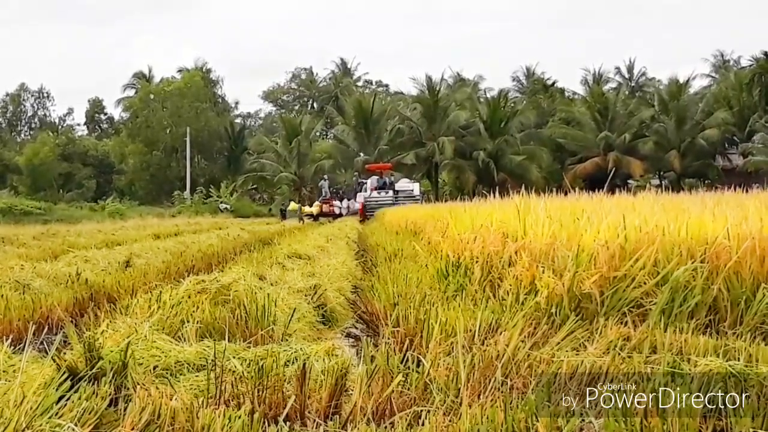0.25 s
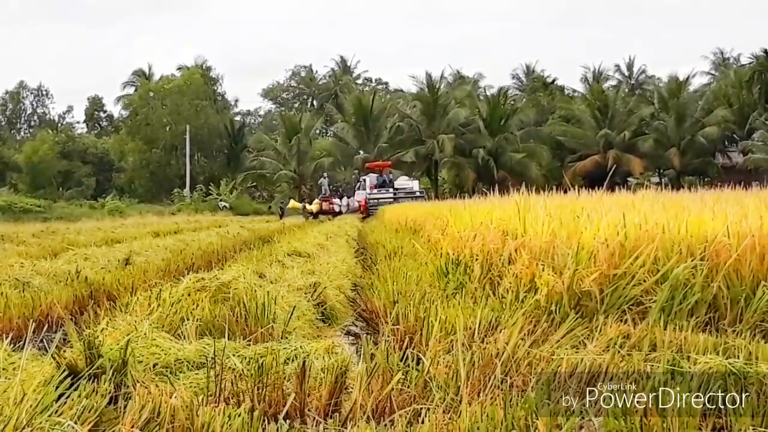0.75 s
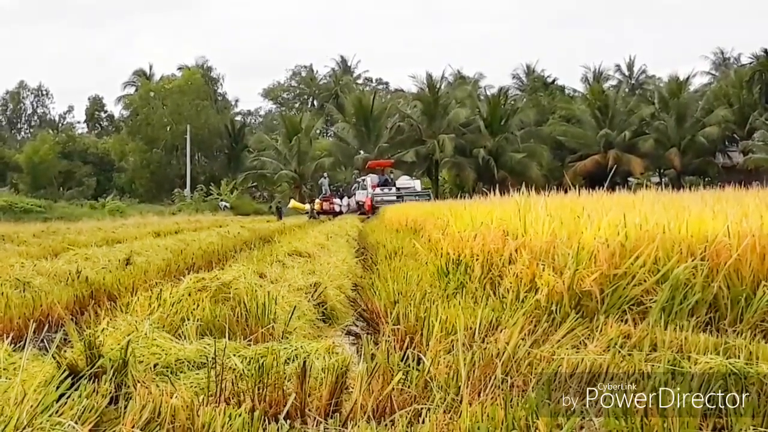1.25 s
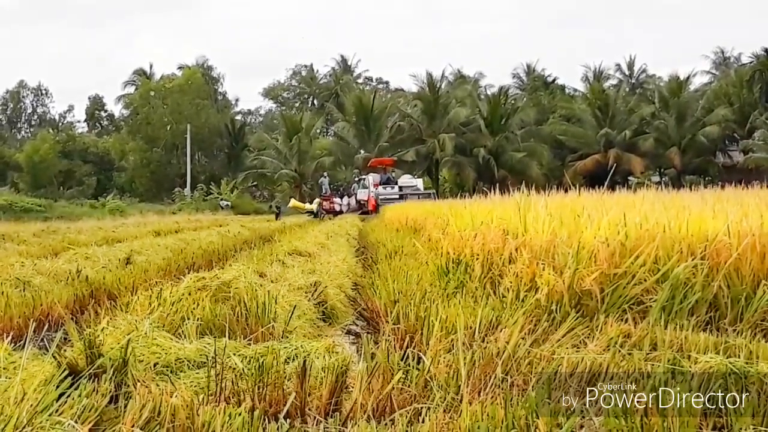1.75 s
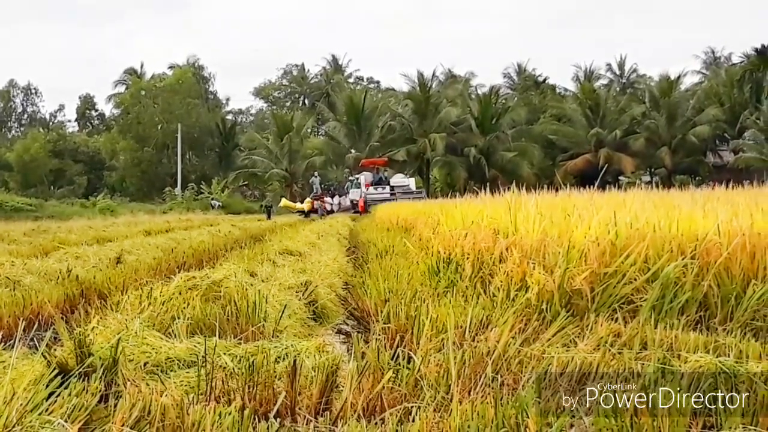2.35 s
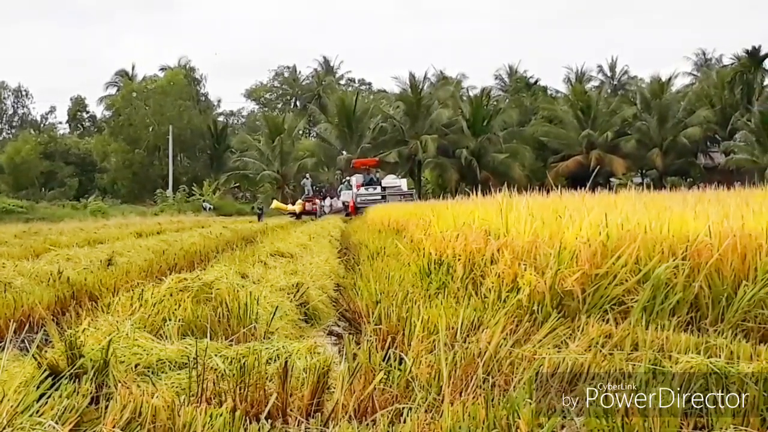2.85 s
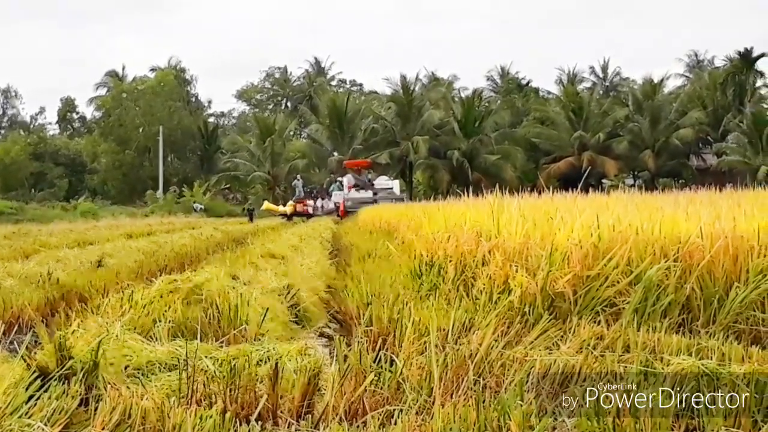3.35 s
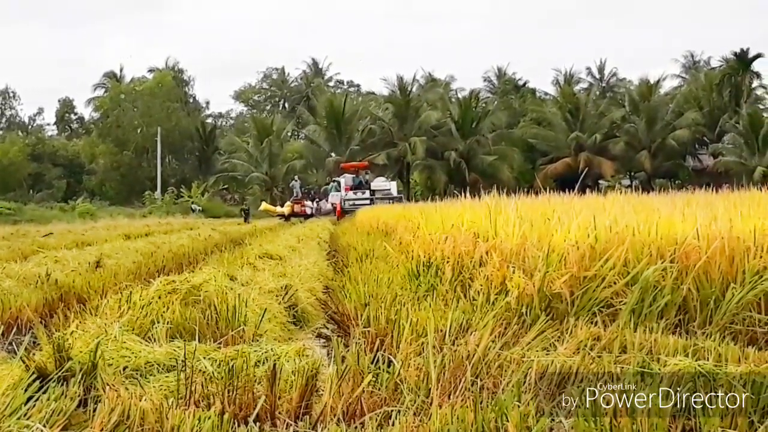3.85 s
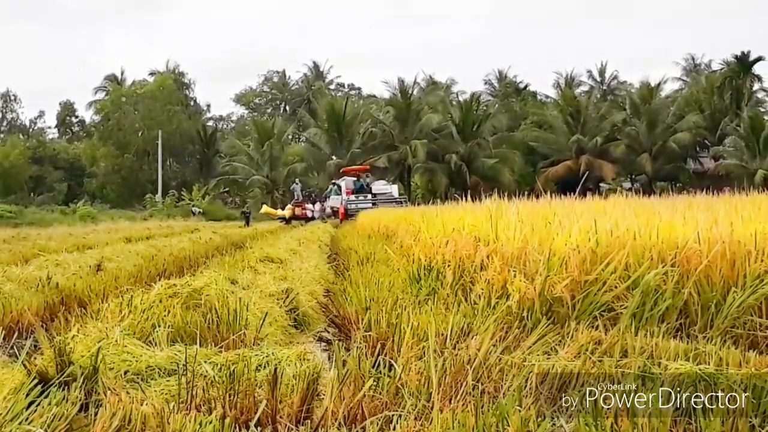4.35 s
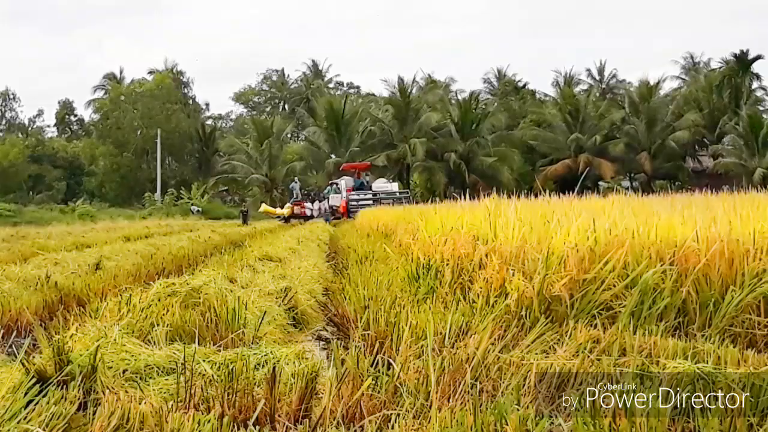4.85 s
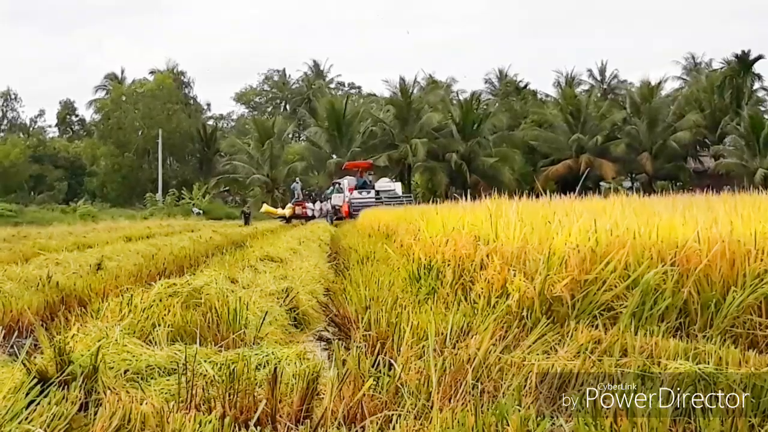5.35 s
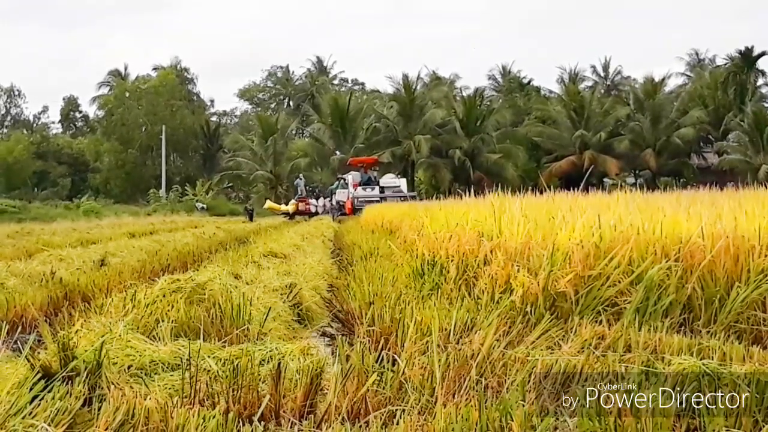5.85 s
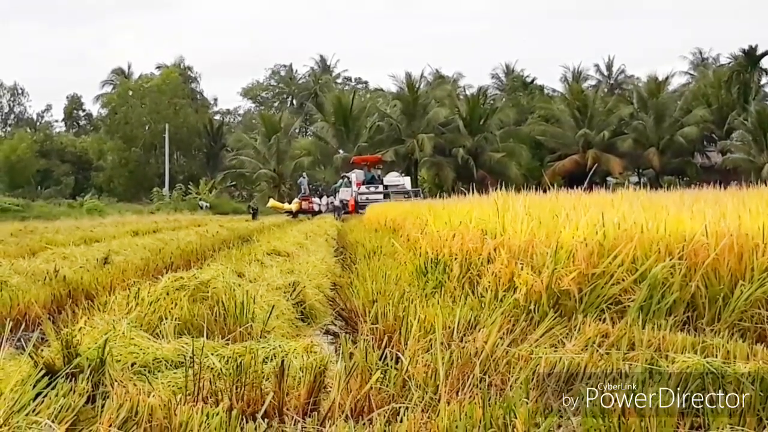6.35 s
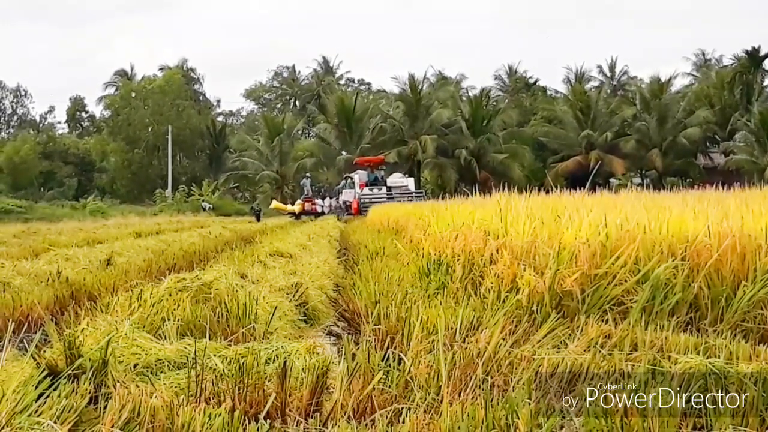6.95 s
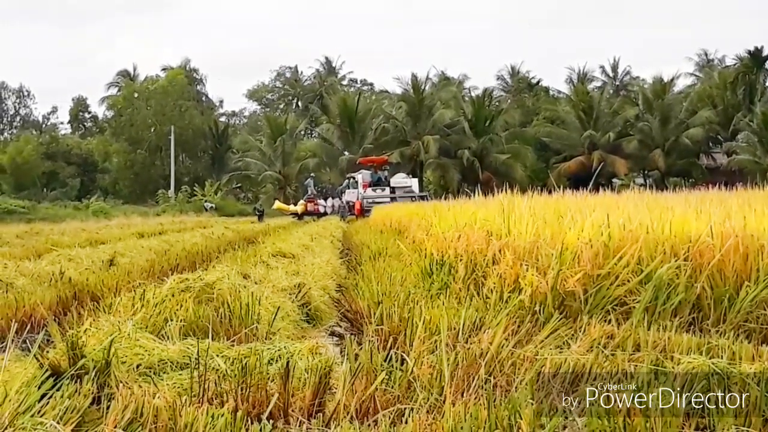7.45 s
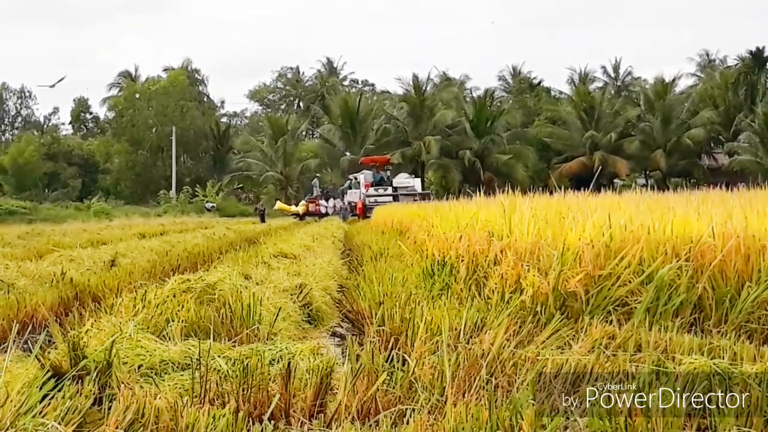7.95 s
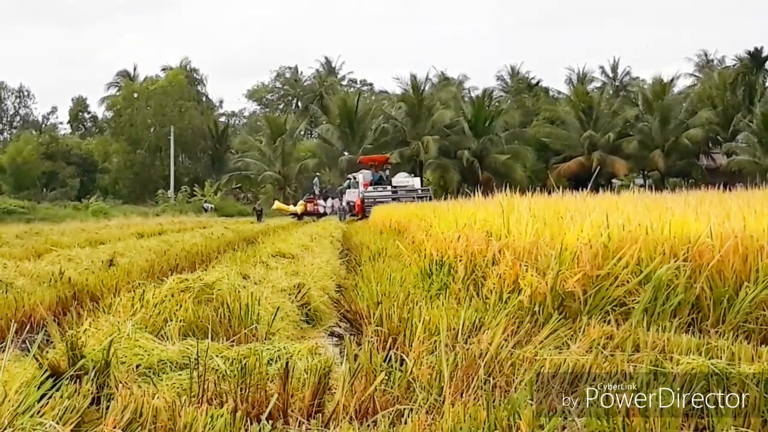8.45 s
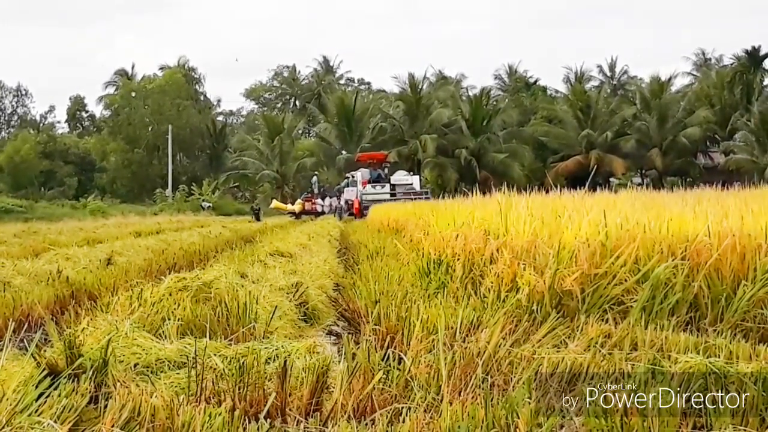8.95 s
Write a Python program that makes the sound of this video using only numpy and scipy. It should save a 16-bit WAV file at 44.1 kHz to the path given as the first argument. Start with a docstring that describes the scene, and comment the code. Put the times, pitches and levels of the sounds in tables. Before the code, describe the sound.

A combine harvester's diesel engine drones steadily as it cuts rice, slowly drawing nearer, with rattling and hissing straw.

```python
"""A combine harvester creeps toward a microphone standing in a rice field. Its four-cylinder diesel
drones, a slower shaft beats against the firing note, and crop pounds the threshing drum into a roar
over the rumble of the panels. Sieves rattle, stalks ring the knife and straw hisses.
A low hum sweeps up once. Close by, dry leaves brush together; a small bird chirps and thin squeaks
sound high above the drone."""
import sys
import numpy as np
from scipy.fft import rfft, irfft, next_fast_len
from scipy.io import wavfile
from scipy.ndimage import uniform_filter1d, map_coordinates

SR = 44100
rng = np.random.default_rng(int(sys.argv[2]) if len(sys.argv) > 2 else 0)


def materialize(psi):
    """Save the field psi as 16-bit PCM at rate SR to the path in sys.argv[1].

    A 1-D psi becomes a single channel; in a 2-D psi each row is a channel.
    """
    bounded = np.clip(np.atleast_2d(psi).T, -1, 1)
    quanta = np.round(bounded * 32767).astype(np.int16)
    wavfile.write(sys.argv[1], SR, quanta)


N = 406161

# The diesel. Each row: time in seconds, firing rate in Hz, level of that note in dB, of its octave in dB.
DIESEL = [(0, 95.3, -51.1, -34), (0.65, 94.7, -41, -36.5), (1.2, 95.2, -34.5, -35.0),
          (1.95, 93.8, -29, -27.5), (2.45, 94.56, -30, -31.4), (3.0, 93.97, -32.5, -27.4),
          (3.7, 94.4, -35.6, -26.0), (4.1, 94.6, -29.8, -24.5), (4.45, 94.1, -26.5, -26.7),
          (4.8, 93.63, -26.3, -20), (5.25, 93.2, -28, -20), (5.75, 94.3, -27, -31.1),
          (6.15, 93.56, -34.5, -33.5), (7.3, 92.26, -34.5, -31), (7.9, 94.6, -33.5, -33),
          (8.4, 94.4, -38, -41.9), (8.85, 94.93, -36.6, -24), (9.21, 95, -31, -27.5)]
# The way toward the microphone. Each row: time in seconds, nearness from 0 (far) to 1 (near).
NEARNESS = [(0, 0.09), (2.9, 0.07), (3.8, 0.51), (7.3, .65), (8.1, 0.91), (9.21, 1)]
# Faint machine tones. Each row: pitch in Hz, opening level in dB, closing level in dB.
MACHINE_WHINES = [(257, -46, -45.5), (348.8, -40.5, -37.5), (412.7, -53, -45.5), (514.3, -51.5, -50),
                  (558, -53.5, -50.5), (631, -80, -56.5), (770, -76, -59), (1618, -65, -70)]
# Spectra of the panels, drum, sieves, straw and leaves. Each row: frequency in Hz, relative level in dB.
PANEL_SPECTRUM = [(10, -46), (28, -40), (45, -21.5), (62, -18.5), (82, -4.5), (120, -1.5), (160, 3),
                  (200, -6.5), (260, -20), (400, -58), (700, -120)]
DRUM_SPECTRUM = [(60, -70), (120, -43), (180, 0), (215, 1.5), (290, -.5), (380, -1), (415, -4.5), (440, -5),
                 (490, -6), (555, -13.5), (595, -23), (700, -30), (1000, -56), (1600, -120)]
SIEVE_SPECTRUM = [(100, -35), (640, 3), (780, 3.5), (930, 0), (1160, 2.5), (1470, -4), (1700, -1),
                  (1900, -3.5), (2200, 1), (2500, -4.5), (4000, -37), (9000, -90)]
STRAW_SPECTRUM = [(1500, -25), (4000, 3.5), (4600, 3.5), (5200, 1), (6400, -.5), (7200, -3), (8650, 1),
                  (9050, -3.5), (9600, -10.5), (10600, -8), (11300, -11), (12300, -9.5), (14300, -12.5),
                  (14750, -14), (15400, -27)]
LEAF_SPECTRUM = [(3000, -40), (8500, -8), (10300, 0), (11500, 0), (12400, 2), (14300, -1), (15400, -14)]
# The panels' rumble and the knife's ring at the microphone. Each row: time in seconds, level in dB.
PANEL_LEVELS = [(0, -29.5), (1.4, -30.5), (3.7, -26), (5.5, -26.7), (6.2, -29), (7.55, -26), (9.21, -28.5)]
KNIFE_LEVELS = [(0, -47), (1.15, -44.5), (2.8, -47.5), (4.05, -48), (4.75, -45.3), (6.9, -46.3),
                (7.65, -47.8), (9.21, -46.5)]
# Clumps of crop passing through the drum. Each row: middle in seconds, gain in dB.
CROP_CLUMPS = [(3.85, 1), (6.15, 2), (6.9, 2.5), (8.1, 2.5)]
# The cutter bar's steel. Each row: resonance in Hz, width in Hz, relative level in dB.
KNIFE_RESONANCES = [(2790, 310, -1), (2884, 70, -2.5), (3110, 100, 0), (3333, 180, 0.5), (3470, 170, -2.5),
                    (3720, 115, -0.5), (3950, 220, -3), (4180, 190, -5)]
# Swells in the straw's hiss. Each row: middle in seconds, half length in seconds, gain in dB.
STRAW_SURGES = [(.7, .3, 1), (9.1, 0.27, 0.8)]
# The rising hum's harmonics. Each row: multiple of the pitch, relative level in dB.
HUM_HARMONICS = [(1, -7), (2, 2.5), (3, -9), (4, -19)]
# The bird's chirp and the thin squeaks. Each row: start in seconds, length in seconds,
# first, middle and last pitch in Hz, level in dB, pitch jitter in Hz.
CALLS = [(3.21, .14, 13200, 13500, 13300, -58, 550), (3.255, .12, 11500, 12050, 12300, -57, 280),
         (3.367, 0.14, 12750, 12800, 11600, -53, 170), (3.38, .14, 12900, 13450, 13700, -57.5, 330),
         (3.525, .08, 14600, 13500, 12400, -54, 150), (4.073, 0.091, 4340, 4720, 5300, -51, 90),
         (6.015, .052, 12100, 13400, 14450, -55, 120), (6.065, .09, 13600, 13700, 13200, -60, 280),
         (6.08, .15, 11450, 11700, 11150, -62, 170), (6.15, .11, 14330, 14100, 13100, -59, 140),
         (6.26, .09, 12400, 11900, 11100, -63, 130), (6.688, .18, 13470, 13400, 13300, -54, 550)]
# Dry leaves near the microphone. Each row: middle in seconds, level in dB.
LEAF_TOUCHES = [(.1, -68), (.75, -66), (4.88, -60), (5.0, -58), (5.07, -60), (5.21, -62), (5.41, -60),
                (5.56, -61)]

# Each pair: level with the machine far off, level with it near.
DRUM_DB, SIEVE_DB, STRAW_DB = (-30, -25), (-49.5, -46.5), (-51, -50)
SHAFT_DB, SHAFT_OCTAVE_DB = (-44, -35.5), (-39.5, -40.5)


def diesel(firing, note_db, octave_db):
    """The exhaust note wavers on its way over the field; unequal cylinders add weak lines around it."""
    waver_db = lambda: wobble(rate=7)
    overtone = lambda order: np.sin(order * firing + rng.uniform(0, 2 * np.pi))
    note = amp(note_db + waver_db()) * np.sin(firing)
    octave = amp(octave_db + waver_db()) * overtone(2)
    third = amp(note_db - 10) * overtone(3)
    uneven = sum(overtone(order) / order for order in np.arange(5, 23) / 4)  # four firings to a cycle
    return np.sqrt(2) * (note + octave + third) + amp(-36.5 + 0.67 * wobble(2.4)) * unit(uneven)


def thresher(firing):
    """The panels rumble, and dense blows of crop roar in the drum, harder at each firing."""
    rumble_db = curves(PANEL_LEVELS)[0] + 0.6 * wobble(2.91)
    clumps_db = sum(db * swell(s, half_length=0.093) for s, db in CROP_CLUMPS)
    roar_db = nearing(DRUM_DB) + 0.42 * wobble(2.98) + clumps_db
    rumble = coloured(rng.standard_normal(N), PANEL_SPECTRUM)
    blows = (impacts(rate=2500) + rng.standard_normal(N)) * (1 + 0.19 * np.cos(firing))
    return amp(rumble_db) * rumble + amp(roar_db) * coloured(blows, DRUM_SPECTRUM)


def shaft(pitch_hz=86.4, boom_db=14.1):
    """A shaft a little slower than the firing rate beats against the drone; its octave booms once."""
    angle = phase_of(pitch_hz + 0.1925 * wobble(1))
    note = amp(nearing(SHAFT_DB) + wobble(2.06)) * np.sin(angle)
    octave_db = nearing(SHAFT_OCTAVE_DB) + boom_db * swell(7.57, half_length=0.18)
    octave = amp(octave_db) * np.sin(2 * angle + 0.7 * wobble(6))
    return np.sqrt(2) * (note + octave)


def whines():
    """Other parts of the machine whine faintly, unsteady in pitch and level."""
    tones = np.zeros(N)
    for hz, start_db, end_db in MACHINE_WHINES:
        level_db = np.linspace(start_db, end_db, N) + 2 * wobble(7)
        pitch_hz = hz * (1 + 0.00904 * wobble(22))
        tones += amp(level_db) * np.sin(phase_of(pitch_hz))
    return np.sqrt(2) * tones


def sieves():
    """The sieves rattle with countless small blows, louder as the machine nears."""
    rattle = impacts(rate=5000) + rng.standard_normal(N)
    return amp(nearing(SIEVE_DB)) * coloured(rattle, SIEVE_SPECTRUM)


def knife(firing):
    """Stalks ring the steel knife as they are cut, with a slight pulse at the crank's rate."""
    def steel(f):  # squaring each peak keeps the ring within its band
        peaks = (amp(2 * db) / (1 + ((f - hz) / width) ** 2) ** 2 for hz, width, db in KNIFE_RESONANCES)
        return np.sqrt(sum(peaks))

    cuts = impacts(rate=8000) + rng.standard_normal(N)
    stroke_db = 0.27 * np.cos(firing / 2) + 0.34 * wobble(25)
    return amp(curves(KNIFE_LEVELS)[0] + stroke_db) * unit(filtered(cuts, steel))


def straw():
    """The straw gives a bright, grainy hiss that swells slightly twice."""
    hiss = coloured(impacts(rate=5000) + 1.47 * rng.standard_normal(N), STRAW_SPECTRUM)
    surge_db = sum(db * swell(s, half_length) for s, half_length, db in STRAW_SURGES)
    return amp(nearing(STRAW_DB) + surge_db + 0.33 * wobble(16)) * hiss


def rising_hum(peak_s=3.5, hz_at_peak=75.5, hz_per_s=100, peak_db=-22, attack_s=0.46, release_s=0.33):
    """A low hum climbs steadily by more than an octave, swells and fades into the drone."""
    t = np.arange(N) / SR - peak_s
    envelope = np.interp(t, [-attack_s, 0], [0, 1]) ** 2 * np.interp(t, [0, release_s], [1, 0])
    angle = phase_of(np.maximum(hz_at_peak + hz_per_s * t, 1))
    tone = sum(amp(db) * np.sin(k * angle) for k, db in HUM_HARMONICS)
    return amp(peak_db) * envelope * unit(tone)


def bird_and_squeaks(flutter_db=2):
    """Each call is a whistle gliding through three pitches, raspy with pitch jitter and level flutter."""
    calls = np.zeros(N + SR)
    for s, length, start_hz, middle_hz, end_hz, db, jitter_hz in CALLS:
        progress = np.linspace(0, 1, int(length * SR))
        glide_hz = np.polyval(np.polyfit([0, .5, 1], [start_hz, middle_hz, end_hz], 2), progress)
        jitter = unit(uniform_filter1d(rng.standard_normal(SR), size=40))[:len(progress)]
        envelope = np.sqrt(np.abs(np.sin(np.pi * progress)))
        whistle = np.sin(phase_of(glide_hz + jitter_hz * jitter))
        calls[round(s * SR):][:len(whistle)] += amp(db) * envelope * whistle
    return calls[:N] * amp(flutter_db * wobble(rate=70))


def leaves():
    """Close to the microphone, dry leaves brush each other in short, fine crackles."""
    touch = sum(amp(db) * swell(s, half_length=0.03) for s, db in LEAF_TOUCHES)
    return touch * coloured(impacts(rate=6000), LEAF_SPECTRUM)


def nearing(far_near_db):
    """A part's level in dB, moving from its far to its near value as the machine approaches."""
    far_db, near_db = far_near_db
    return far_db + (near_db - far_db) * curves(NEARNESS)[0]


def amp(db):
    """Decibels to gain."""
    return 10 ** (np.asarray(db) / 20)


def unit(x):
    """Scaled to rms 1."""
    return x / np.sqrt(np.mean(x ** 2) + 1e-20)


def curves(rows):
    """One value per sample for each column after the time."""
    s, *columns = np.transpose(rows)
    return [np.interp(np.arange(N) / SR, s, column) for column in columns]


def swell(s, half_length):
    """A smooth bump of height 1 around a moment, both arguments in seconds."""
    return np.exp(-((np.arange(N) / SR - s) / half_length) ** 2)


def wobble(rate):
    """A smooth random curve, rate knots a second."""
    return map_coordinates(rng.standard_normal(int(N * rate / SR) + 4), [np.arange(N) * rate / SR])


def impacts(rate):
    """Small blows of random size, about rate a second, at rms 1."""
    return unit((rng.random(N) < rate / SR) * rng.standard_normal(N))


def phase_of(hz):
    """The running angle of a changing frequency."""
    return 2 * np.pi * np.cumsum(hz) / SR


def filtered(x, response):
    """x with its spectrum multiplied by a response of frequency."""
    size = next_fast_len(N + 8192)
    return irfft(rfft(x, size) * response(np.fft.rfftfreq(size, 1 / SR)), size)[:N]


def coloured(x, spectrum):
    """x shaped by (Hz, dB) points, at rms 1."""
    f, db = np.transpose(spectrum)
    return unit(filtered(x, lambda hz: amp(np.interp(np.log(hz + 1), np.log(f), db))))


def scene():
    """The harvester and the small sounds of the field, heard from one spot in one channel."""
    firing_hz, note_db, octave_db = curves(DIESEL)
    firing = phase_of(firing_hz)
    drone = diesel(firing, note_db, octave_db) + shaft() + whines()
    harvesting = thresher(firing) + sieves() + knife(firing) + straw()
    return (drone + harvesting + rising_hum() + bird_and_squeaks() + leaves())[None]


def record(dry, top_hz=15500, fade_s=0.004):
    """The microphone's signal fades in and out without a click and keeps nothing above top_hz."""
    t = np.arange(N) / SR
    fade = np.minimum(1, np.minimum(t, t[::-1]) / fade_s)
    return np.array([filtered(fade * channel, lambda hz: hz < top_hz) for channel in dry])


dry = scene()
out = record(dry)
materialize(out)
```